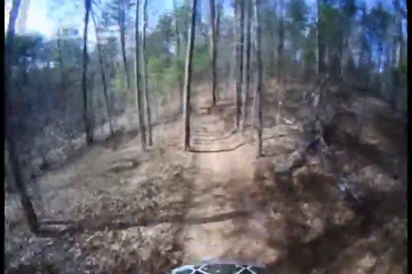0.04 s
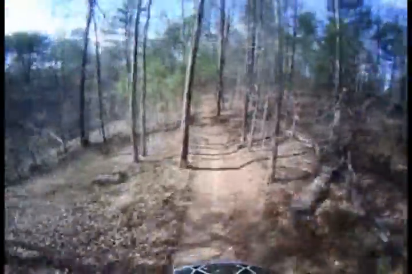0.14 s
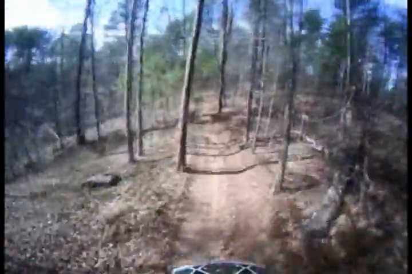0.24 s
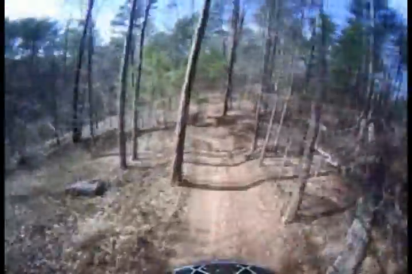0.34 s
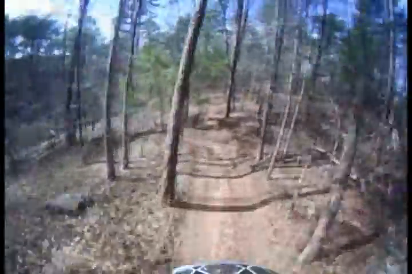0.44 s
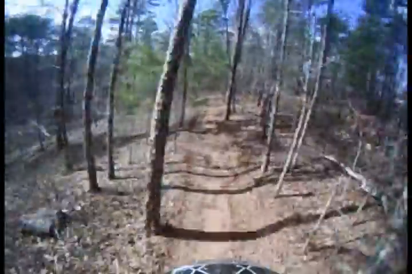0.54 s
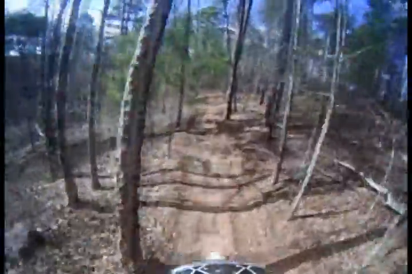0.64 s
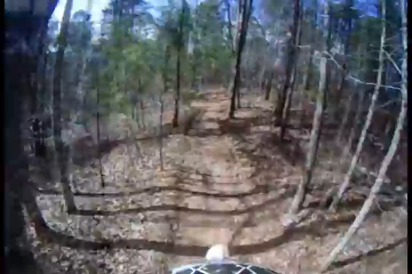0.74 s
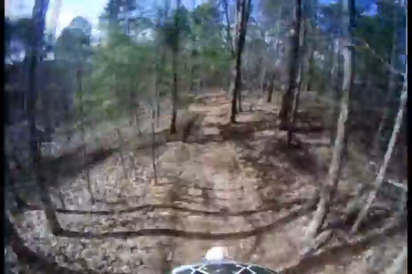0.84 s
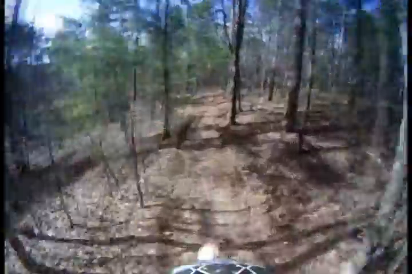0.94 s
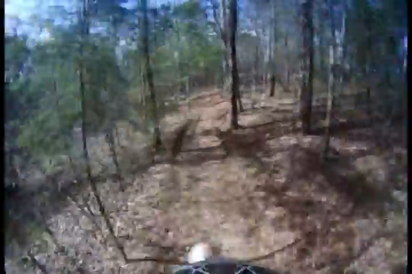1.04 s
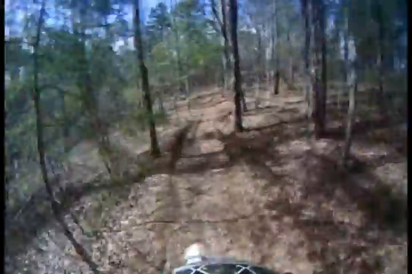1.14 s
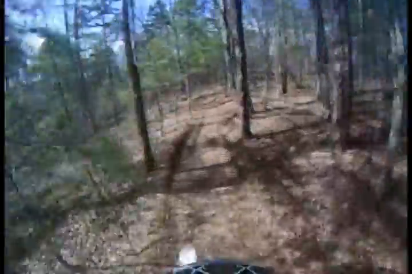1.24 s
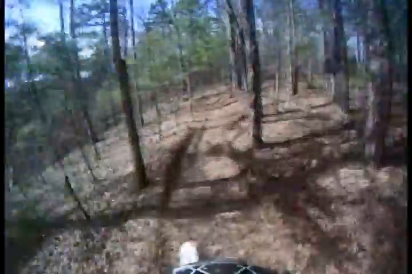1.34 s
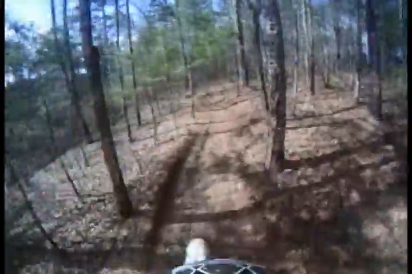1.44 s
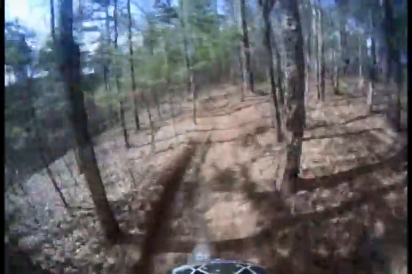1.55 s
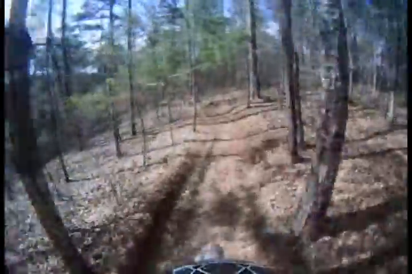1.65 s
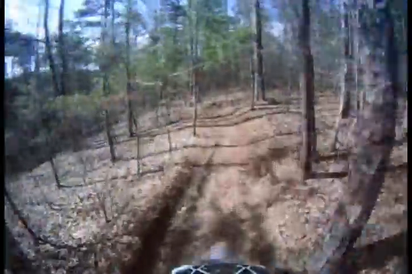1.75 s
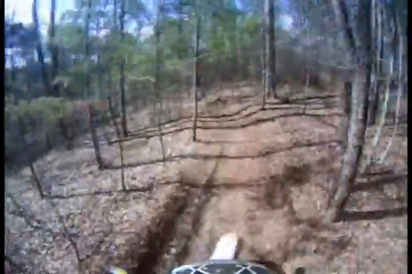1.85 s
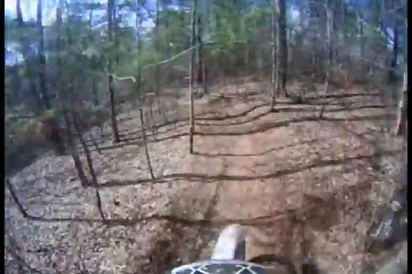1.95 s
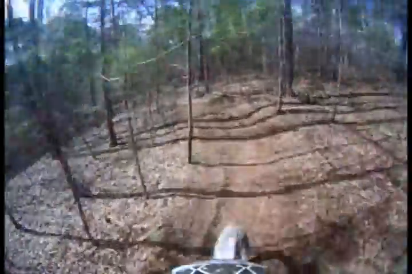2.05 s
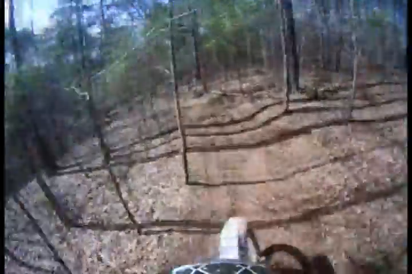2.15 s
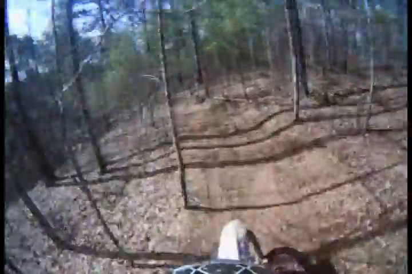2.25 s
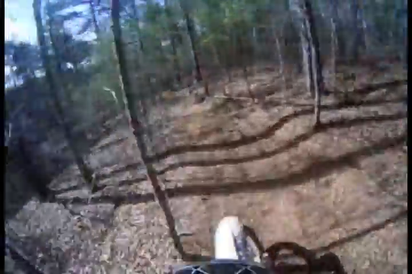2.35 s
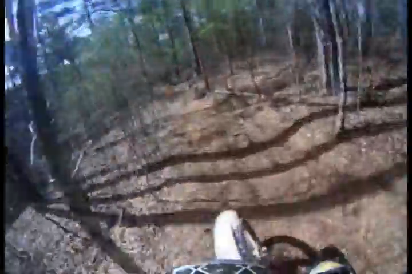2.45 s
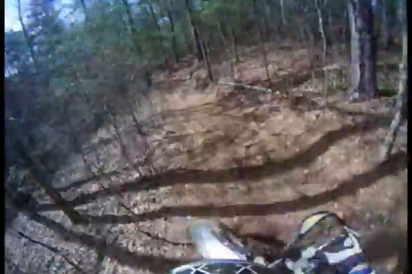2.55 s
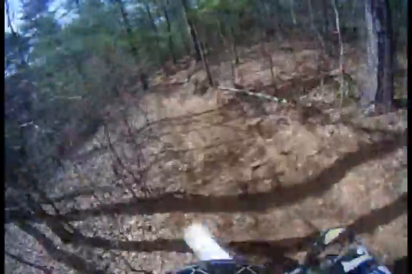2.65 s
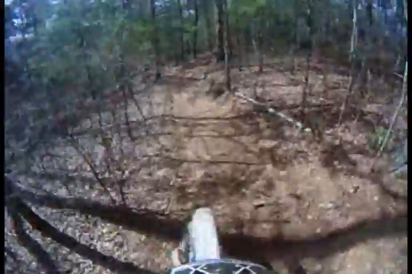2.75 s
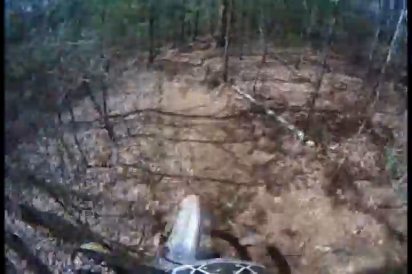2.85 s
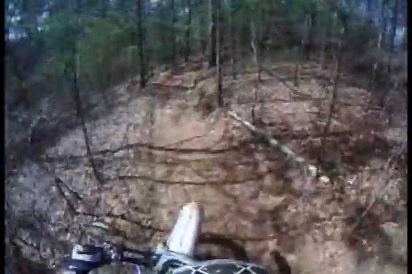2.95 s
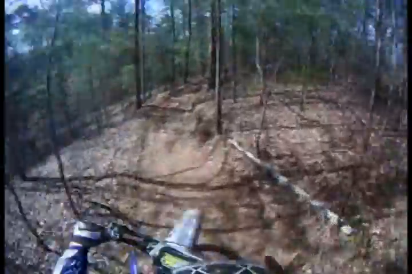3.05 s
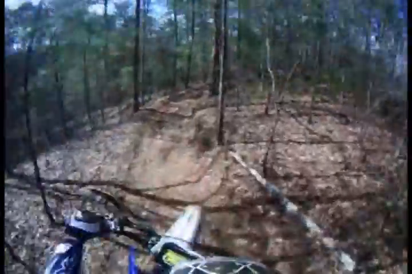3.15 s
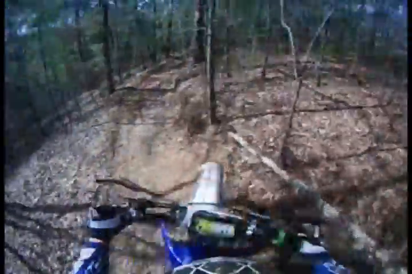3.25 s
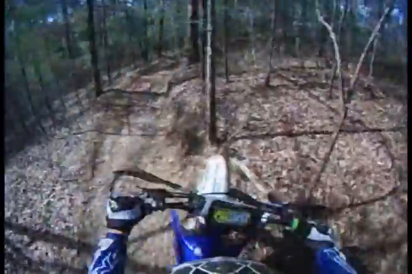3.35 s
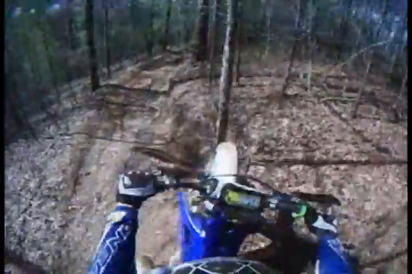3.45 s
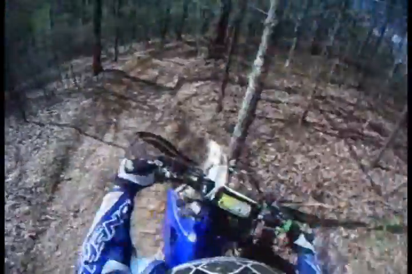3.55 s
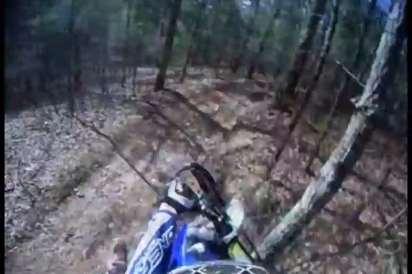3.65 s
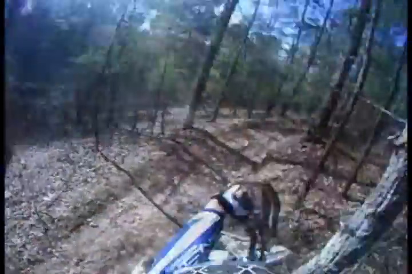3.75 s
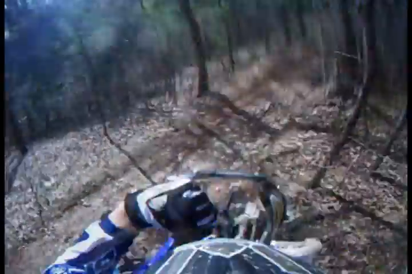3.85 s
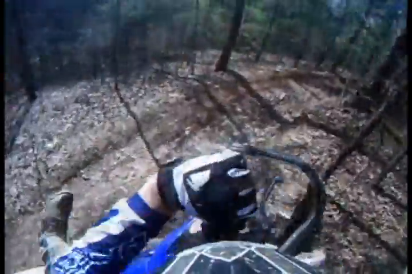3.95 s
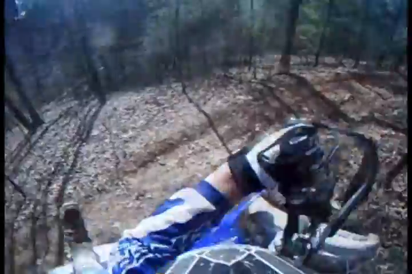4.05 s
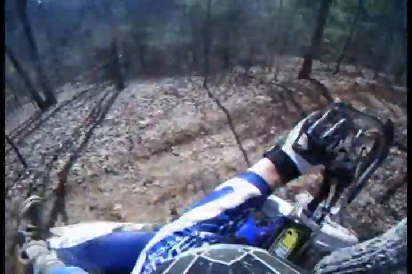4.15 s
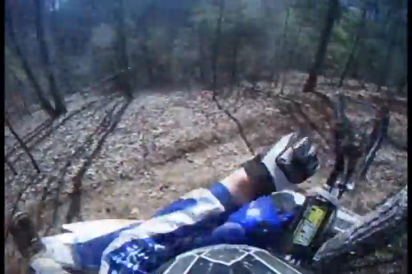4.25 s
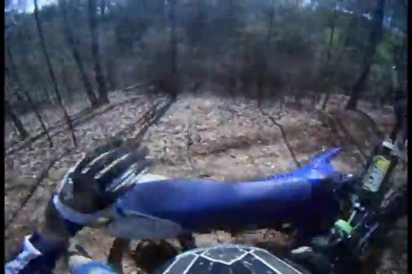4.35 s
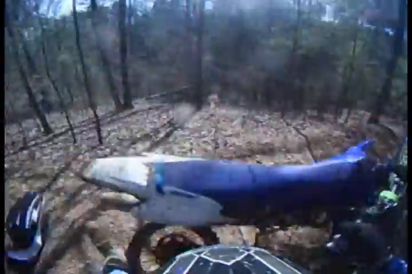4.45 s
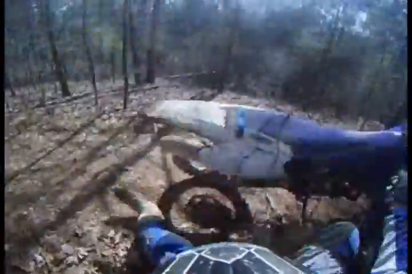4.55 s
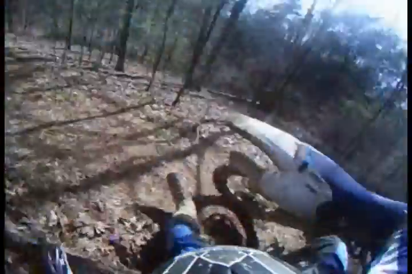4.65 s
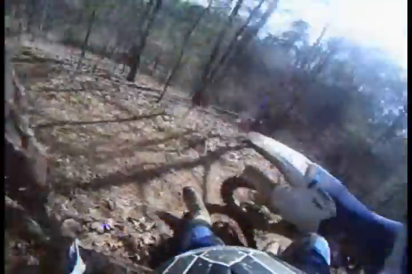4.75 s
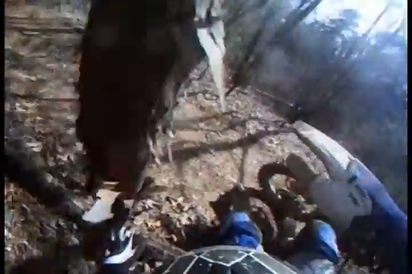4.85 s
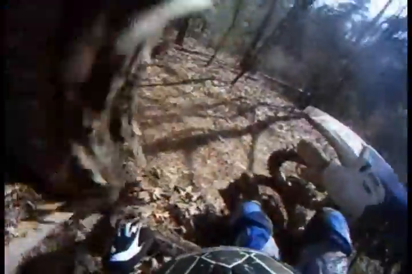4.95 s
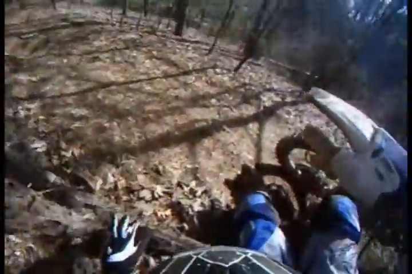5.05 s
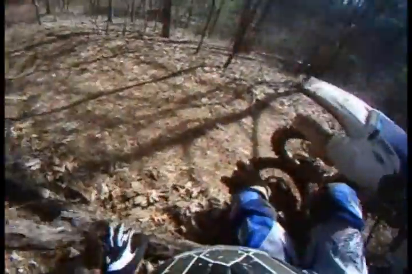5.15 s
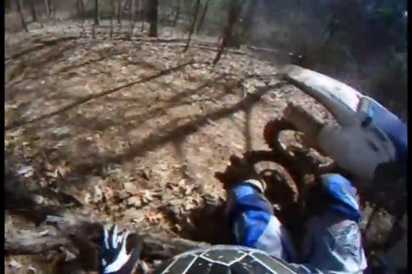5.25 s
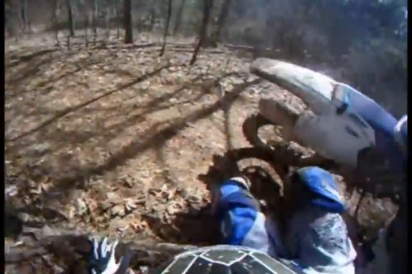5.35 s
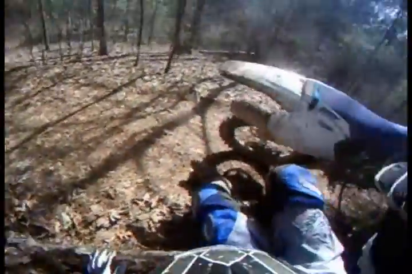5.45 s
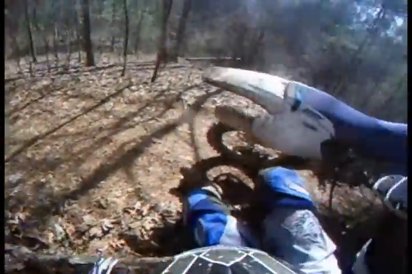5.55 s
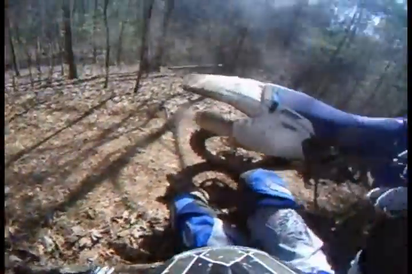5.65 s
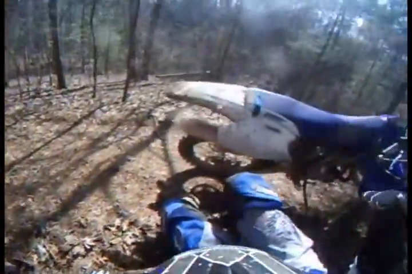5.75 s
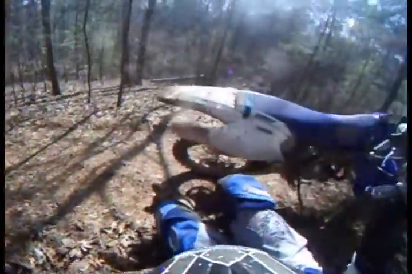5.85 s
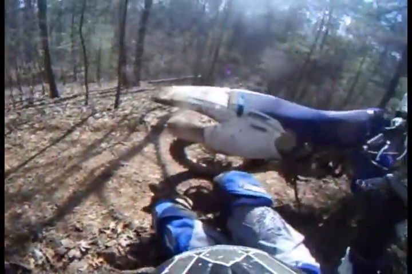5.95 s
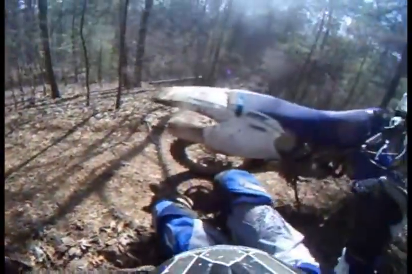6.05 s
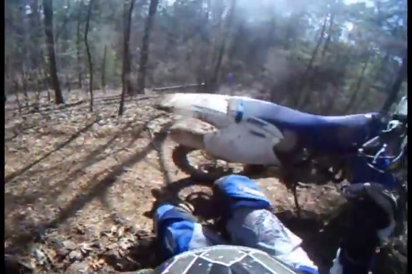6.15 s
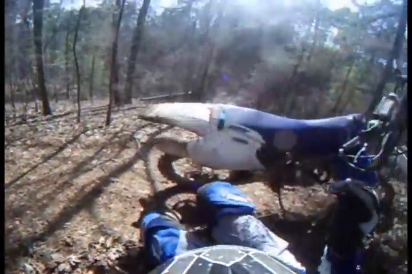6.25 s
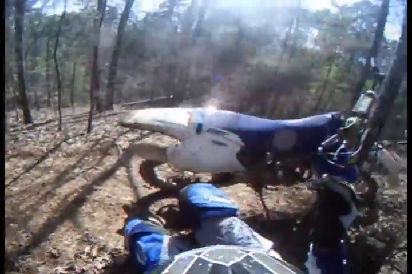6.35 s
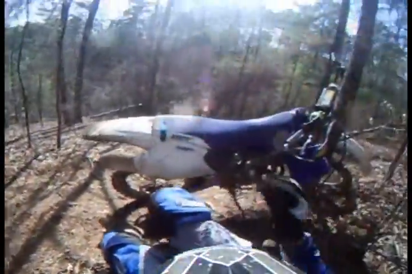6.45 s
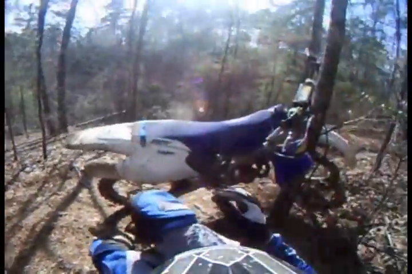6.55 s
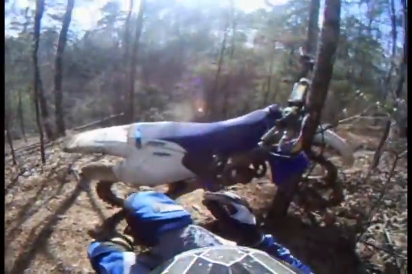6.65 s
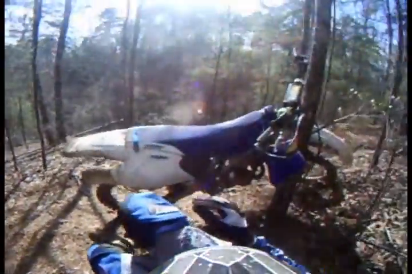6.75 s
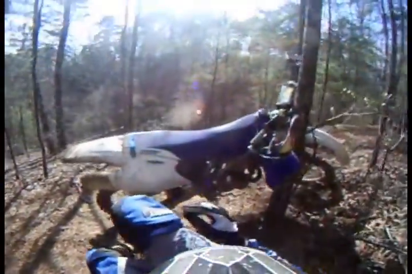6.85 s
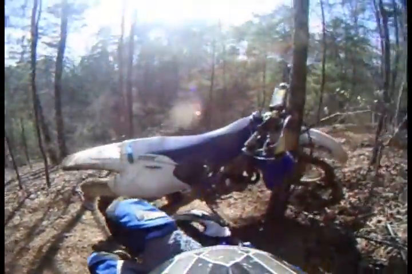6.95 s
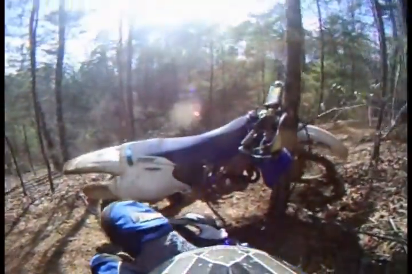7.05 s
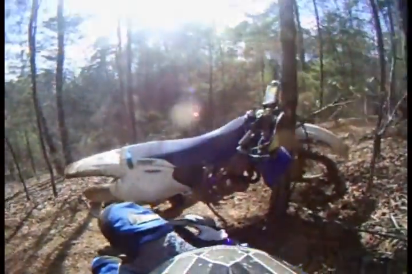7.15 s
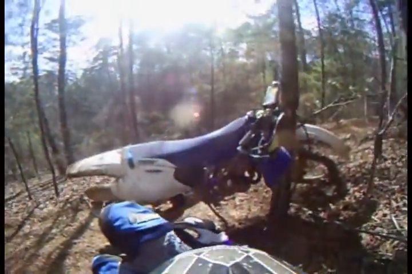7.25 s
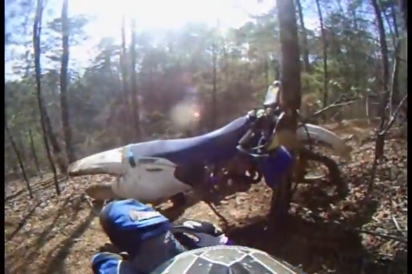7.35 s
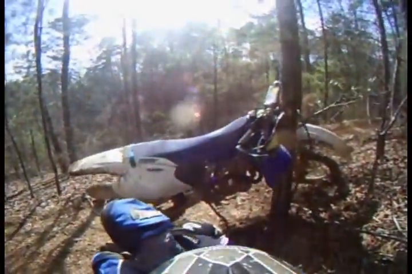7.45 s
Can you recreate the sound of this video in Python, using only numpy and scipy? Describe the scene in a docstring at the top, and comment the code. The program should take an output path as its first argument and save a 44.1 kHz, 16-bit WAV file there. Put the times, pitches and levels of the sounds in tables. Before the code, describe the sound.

Close, muffled sound from a rider's helmet: a single-cylinder dirt bike growls along a woodland trail in throttle bursts, with low wind buffeting. It bumps, revs once more, then hits a tree. Heavy thumps, cracking plastic and metal, and overloaded microphone crackles tumble over one another for two seconds. Afterwards the engine only puffs softly and unevenly, with a few small knocks.

```python
"""A forest trail, heard from a camera on the rider's helmet: a single-cylinder four-stroke dirt bike.
Firing pulses ring the airbox and exhaust pipe, noise whirs in the engine cases; six throttle twists shape the bark.
The bike hits a tree and falls: noise bursts ring the bodywork, sines thump and sway the helmet, and the camera
rattles in its mount, pinning the microphone from limit to limit so that it crackles.
Afterwards soft uneven puffs idle on the ground and dry leaves rustle as filtered noise."""
import sys
import numpy as np
from scipy import signal
from scipy.fft import rfft, irfft, next_fast_len
from scipy.io import wavfile
from scipy.ndimage import uniform_filter1d

SR = 44100
rng = np.random.default_rng(int(sys.argv[2]) if len(sys.argv) > 2 else 0)


def put_to_file(sound):
    """Save the sound as 16-bit audio at rate SR, in the file named by the first command-line argument."""
    columns = np.atleast_2d(sound).T  # one column per channel
    safe = np.clip(columns, -1, 1)
    whole_steps = np.round(safe * 32767)
    wavfile.write(sys.argv[1], SR, whole_steps.astype(np.int16))


N = 331178
TIME = np.arange(N) / SR
FALL_START_S, FALL_END_S = 4.6, 5.4      # the bike tips over
SLIDE_START_S, SLIDE_LENGTH_S, SLIDE_DECAY_DB_PER_S = 3.68, 1, 55.5
TUMBLE_ATTACK_S = 0.036


def from_db(db):
    """Decibels to gain."""
    return 10 ** (np.asarray(db) / 20)


def rms_one(x):
    """Scale to rms 1."""
    return x / np.sqrt(np.mean(x ** 2) + 1e-20)


def in_time(rows):
    """One curve over time for each column after the first."""
    s, *columns = np.transpose(rows)
    return [np.interp(TIME, s, column) for column in columns]


def cut(x, hz, kind, order=2):
    """Butterworth filter."""
    return signal.sosfilt(signal.butter(order, hz, kind, fs=SR, output="sos"), x)


def drift(hz):
    """Random wander slower than hz, with rms 1; a second of run-in is dropped."""
    return rms_one(cut(rng.standard_normal(N + SR), hz, "low")[SR:])


def coloured(x, spectrum):
    """Shape a sound with a smooth spectral curve; rms 1."""
    hz, db = np.transpose(spectrum)
    size = next_fast_len(N, True)
    bins = np.maximum(np.fft.rfftfreq(size, 1 / SR), 1)
    gain = from_db(np.interp(np.log(bins), np.log(hz), db))
    return rms_one(irfft(rfft(x, size) * gain, size)[:N])


def resonate(x, modes):
    """Parallel two-pole resonances, each given as centre Hz, width Hz and dB."""
    out = 0
    for hz, width, db in modes:
        r = np.exp(-np.pi * width / SR)
        zeros = np.array([1, 0, -1]) * (1 - r * r) / 2
        poles = [1, -2 * r * np.cos(2 * np.pi * hz / SR), r * r]
        out = out + from_db(db) * signal.lfilter(zeros, poles, x + 1e-18)
    return out


def envelope(start_s, hold_s, attack_s, decay_db_per_s):
    """Rise to 1 just before the start, hold, then die away."""
    rise = np.clip(1 + (TIME - start_s) / attack_s, 0, 1)
    return rise * from_db(-decay_db_per_s * np.maximum(TIME - start_s - hold_s, 0))


def fallen():
    """0 while the bike is upright, 1 once it lies on the ground."""
    return np.interp(TIME, [FALL_START_S, FALL_END_S], [0, 1])


def cycle_count(speed, firing_s):
    """Engine cycles gone by, counted from one firing."""
    cycles = np.cumsum(in_time(speed)[0]) / SR
    return cycles - np.interp(firing_s, TIME, cycles)


def firings(cycles, uneven_db, jitter_s):
    """One click per engine cycle, each with its own strength and slight timing error."""
    at = np.flatnonzero(np.diff(np.floor(cycles)) > 0)
    chance = rng.standard_normal((len(at), 2))
    places = np.clip(at + (chance[:, 0] * jitter_s * SR).astype(int), 0, N - 1)
    clicks = np.zeros(N)
    clicks[places] = from_db(uneven_db * chance[:, 1])
    return clicks


# engine speed while riding: [t/s, firing rate f/Hz]
RIDE_REVS = [(0, 46.2), (.23, 42.5), (.42, 52), (.55, 48.6), (.7, 49.4), (.89, 42.3), (1.05, 45.6),
             (1.23, 45.7), (1.6, 42.1), (1.89, 42.7), (2.17, 38.3), (2.48, 37.8), (2.66, 36.6), (2.8, 33.7),
             (2.85, 39), (2.99, 48), (3.12, 51.4), (3.25, 41.6)]


def engine():
    """One count of firings drives intake, exhaust and whirr; the idle has its own count."""
    revs = list(RIDE_REVS) + list(IDLE_REVS)
    speed, cycles = in_time(revs)[0], cycle_count(revs, firing_s=.531)
    load = throttle()
    return intake(cycles, load) + exhaust(cycles, speed, load) + whirr(cycles, speed, load) + idle()


# twists of the throttle: [t/s, held t/s, intake bark level/dB, swell in dB per s]
TWISTS = [(0, 0.095, -39, -42), (0.291, 0.416, -30, 3), (1.769, 0.19, -43, 17), (2.28, 0.46, -41.5, 28.5),
          (2.84, 0.3, -20.5, -9.5), (3.67, 0.07, -24, -22)]
THROTTLE_OPEN_S, THROTTLE_SHUT_DB_PER_S, THROTTLE_SHUT_DB = 0.02, 187, -55.5


def throttle():
    """Strength of the intake bark: each twist opens fast, swells or sags while held, and shuts."""
    load = from_db(THROTTLE_SHUT_DB) * envelope(0, FALL_START_S, THROTTLE_OPEN_S, SLIDE_DECAY_DB_PER_S)
    for s, held, db, swell in TWISTS:
        strength = from_db(db + swell * np.clip(TIME - s, 0, held))
        load = load + strength * envelope(s, held, THROTTLE_OPEN_S, THROTTLE_SHUT_DB_PER_S)
    return load


# airbox and frame resonances: [f/Hz, width f/Hz, level/dB]
AIRBOX = [(259.6, 55, 7), (300, 70, 5.5), (342, 60, -7), (545, 64, 4), (634, 29, -3.5), (786, 33, -9),
          (1000, 240, -7), (1340, 110, -10), (1404, 78, -3), (1840, 200, -23), (2520, 190, -33),
          (3050, 250, -32)]
FULL_BARK_DB, BARK_BODY_HZ = -17.5, 1070


def intake(cycles, load, duct_s=0.003485, echo=0.21, top_hz=2400):
    """Each gulp of air is a pulse with a faint puff; it echoes along the duct and rings in the airbox."""
    clicks = firings(cycles, uneven_db=1.2, jitter_s=.00003)
    puff_decay = np.exp(-1 / (.004 * SR))
    puff = .012 * signal.lfilter([1], [1, -puff_decay], clicks) * rng.standard_normal(N)
    trip = int(duct_s * SR)
    gulps = clicks + puff + echo * np.roll(clicks, trip) + echo ** 2 * np.roll(clicks, 2 * trip)
    bark = cut(scatter(resonate(gulps, AIRBOX)), top_hz, "low", order=3)
    body = cut(bark, BARK_BODY_HZ, "low", order=1)
    # a part-open throttle gives a rounder bark
    brightness = np.clip(load / from_db(FULL_BARK_DB), 1e-6, 1)
    return load * (body + brightness * (bark - body)) / np.std(bark)


# short sound paths between airbox and helmet: [delay t/s]
SCATTER_PATHS = [.0004, .0007, .0011, .0017]


def scatter(x):
    """Short reflections (allpasses) smear a click into a burst that is the same every time."""
    for delay_s in SCATTER_PATHS:
        taps = np.zeros(int(delay_s * SR) + 1)
        taps[0], taps[-1] = .55, 1
        x = signal.lfilter(taps, taps[::-1], x + 1e-18)
    return x


DRONE_DB, BOOM_DB = -29, -31.5
BOOM_CHOKE = 25      # the bark of an open throttle chokes the boom
OVERRUN_DB_PER_S = 15      # extra boom after the throttle shuts, per second it was held
OVERRUN_AFTER_S, OVERRUN_WIDTH_S = 0.11, 0.032
OVERTONE_DB, LUG_HZ, LUG_DB_PER_HZ = -35, 35.2, 1.33      # overtones weaken above this firing rate


def exhaust(cycles, speed, load):
    """A drone at twice the firing rate, and firings that boom when a harmonic meets a pipe resonance."""
    drone = from_db(DRONE_DB + 1.4 * drift(11)) * np.sin(4 * np.pi * cycles)
    clicks = firings(cycles, uneven_db=2.0, jitter_s=.00015)
    pipe = resonate(resonate(clicks, [(180.2, 8.3, 8.5), (131.0, 7.7, -4.5)]), [(178, 68, 0)])
    overrun_db = 0
    for s, held, _, _ in TWISTS:
        since_peak = TIME - s - held - OVERRUN_AFTER_S
        overrun_db = overrun_db + OVERRUN_DB_PER_S * held * np.exp(-(since_peak / OVERRUN_WIDTH_S) ** 2)
    boom = from_db(BOOM_DB + overrun_db) / (1 + BOOM_CHOKE * load) * rms_one(pipe)
    higher_modes = resonate(resonate(clicks, [(330.4, 18, 4.0), (582, 76, -4.5)]), [(399, 220, 0)])
    overtone_db = OVERTONE_DB - LUG_DB_PER_HZ * np.maximum(speed - LUG_HZ, 0)
    overtone = from_db(overtone_db) * rms_one(higher_modes)
    riding = np.interp(TIME, [3.3, 4.4, 5.4], [1, .4, 0])      # fades as the bike goes down
    return riding * (drone + boom + overtone)


# spectrum of the whirr: [f/Hz, level/dB]
WHIRR_COLOUR = [(300, 1), (450, -1), (580, -3), (800, -3.5), (1100, -8), (1430, -7), (1800, -9.5),
                (2440, -7.5), (3100, -15), (3650, -28), (4300, -30.5), (4950, -47), (5900, -30),
                (7500, -71.5)]
# ringing of the engine cases: [f/Hz, width f/Hz, level/dB]
CASES = [(1453, 34, 4.5), (2478, 98, -0.5), (3048, 220, -7), (5190, 2100, -14)]
WHIRR_DB, CRUISE_HZ, WHIRR_DB_PER_OCTAVE = -39.5, 43.9, 11      # gain at the cruising firing rate
WHIRR_LOAD = 0.098      # gain added per unit of intake bark
FALLEN_WHIRR_DB = -11.5      # the engine is screened once the bike lies down


def whirr(cycles, speed, load, throb=0.055):
    """Valve train and chain ring in the cases, throb with every cycle and grow with speed and load."""
    grains = rng.standard_normal(N) * (1 + throb * np.cos(2 * np.pi * cycles)) * from_db(2.1 * drift(170))
    noise = from_db(1.14) * coloured(grains, WHIRR_COLOUR) + from_db(-8) * rms_one(resonate(grains, CASES))
    speed_db = WHIRR_DB_PER_OCTAVE * np.log2(speed / CRUISE_HZ)
    level_db = WHIRR_DB + speed_db + FALLEN_WHIRR_DB * fallen()
    return (from_db(level_db) + WHIRR_LOAD * load) * noise


# the engine sinks unevenly to idle: [t/s, firing rate f/Hz]
IDLE_REVS = [(3.6, 36.4), (4.402, 24.2), (5.403, 27.7), (6.198, 24.3), (6.371, 26), (6.553, 35),
             (6.854, 25), (6.999, 25.2), (7.2, 26.4), (7.51, 22)]
# spectrum of the idle rumble: [f/Hz, level/dB]
IDLE_COLOUR = [(15, -19), (25, 9), (44, -1), (59, 4.5), (183, -9), (249, -37.5), (374, -16.5), (957, -33),
               (1200, -32), (1560, -88), (2640, -120)]


def idle():
    """Soft, uneven puffs from the silencer of the fallen bike, over a low rumble."""
    clicks = firings(cycle_count(IDLE_REVS, firing_s=5.4605), uneven_db=4.2, jitter_s=.0016)
    silencer = resonate(clicks, [(56.7, 112, 33), (123.4, 23, 6.5), (185, 69, -8.0)])
    puffs = -rms_one(cut(silencer, 234, "low", order=3))
    rumble = coloured(rng.standard_normal(N), IDLE_COLOUR)
    low = rms_one(cut(rng.standard_normal(N), [24, 50], "band"))
    fade_in = np.interp(TIME, [4.3, 5.3], [0, 1])
    return fade_in * (from_db(-38.0) * puffs + from_db(-40.5) * rumble + from_db(-37.5) * low)


# blows on plastic, metal and dry brush: [t/s, level/dB, length t/s, own ring f/Hz]
BLOWS = [(2.673, -22, 0.018, 2500), (3.171, -23, 0.0098, 3300), (3.429, -7, 0.015, 2310),
         (3.694, -24, 0.076, 2010), (3.821, -8, 0.036, 2290), (3.869, -4.5, 0.0064, 1990),
         (3.987, -19, 0.0063, 2280), (3.992, 0, 0.018, 1970), (4.294, -24.5, 0.0064, 2900),
         (4.4, -12, 0.0015, 2510), (4.427, -25, 0.0081, 3180), (4.471, -25, .008, 1810),
         (4.49, -22, 0.0073, 3120), (4.681, -13, 0.016, 2350), (4.774, -30, 0.09, 2980),
         (4.794, 3.5, .004, 2900), (5.094, -22.5, 0.031, 2780), (5.168, -1.5, 0.014, 3150),
         (5.207, -5, 0.0077, 3150), (5.237, -8.5, .015, 2640), (5.268, -7.5, 0.018, 2450),
         (5.284, -3, 0.019, 2700), (5.307, -18.5, 0.023, 2600), (5.973, -20.5, 0.0058, 2780),
         (6.566, -29, 0.017, 2370), (7.35, -39.5, 0.0058, 2240), (7.436, -44, 0.0069, 2320),
         (7.476, -36.5, 0.024, 2290)]
# what the blows ring with: [f/Hz, width f/Hz, level/dB]
BODYWORK = [(580, 340, 7.5), (1130, 390, 10), (1472, 166, 13.5), (1940, 280, 11), (2357, 160, 15),
            (2900, 120, -2), (3350, 300, -30.5), (4070, 500, -22.5), (4900, 740, -57.5), (5340, 280, 2)]


def blows(grain_db=3.0, tail_s=0.0053, ring_db=-3):
    """Each blow is a short crush of tiny cracks into the bodywork, with one ring of its own."""
    crush, rings = np.zeros(N), np.zeros(N)
    for s, db, length, hz in BLOWS:
        start = int(s * SR)
        age = TIME[:min(SR // 8, N - start)]
        crack_db = grain_db * (np.minimum(rng.exponential(1, len(age)), 4) - 4.5)
        cracks = rng.standard_normal(len(age)) * from_db(crack_db)
        # a sharp attack, a slow sag over the length, then a fast tail
        decay = np.exp(-.5 * age / length - np.maximum(age - length, 0) / tail_s)
        burst = from_db(db) * cracks * np.minimum(age / 0.00013, 1) * decay
        span = slice(start, start + len(age))
        crush[span] += burst
        rings[span] += resonate(burst, [(hz, 260, ring_db)])
    return resonate(crush, BODYWORK) + from_db(18) * cut(rings, 5000, "low", order=4)


# the camera rattles in its mount: [t/s, length t/s, number of knocks, last one stays pressed t/ms]
RATTLES = [(3.29, .0286, 4, 12), (3.3428, .0188, 2, 23), (3.3847, .0197, 2, 14), (3.4389, .0165, 2, 6),
           (3.7906, .016, 2, 8), (3.8719, .0141, 2, 55), (3.9339, .033, 2, 8), (3.9763, .0045, 2, 3),
           (4.007, .029, 6, 28), (4.0586, .0244, 2, 18), (4.1016, .0184, 2, 4), (4.1241, .0154, 3, 35),
           (4.169, .0206, 2, 6), (4.195, .0246, 2, 10), (4.2287, .0431, 4, 9), (4.656, .028, 4, 8),
           (4.7133, .0132, 2, 9), (4.824, 0, 1, 3), (5.1155, .0035, 2, 17), (5.136, .024, 2, 8),
           (5.1991, .0325, 3, 6)]
RATTLE_SLOWING = 1.15      # over 1: the gaps between knocks lengthen


def knocks():
    """The knocks of all rattles as (s, hold s): each presses the camera until the next one."""
    rows = []
    for s, length, count, last_ms in RATTLES:
        times = s + length * np.linspace(0, 1, int(round(count))) ** RATTLE_SLOWING
        rows += zip(times, np.append(np.diff(times), last_ms / 1000))
    return rows


def jolts(force=0.73, bounce_s=0.00031, seat_s=0.001364, windup_s=0.0031, snap_hz=2600):
    """Camera pressure and hold (0-1): drawn one way, it snaps back, bounces, stays pressed and relaxes."""
    push, age, side = np.zeros(N), TIME[:SR // 8], -1
    lead = int(windup_s * SR)
    draw = np.linspace(0, 1, lead) ** 3
    hits = knocks()
    for (s, hold_s), (early, late, size) in zip(hits, rng.random((len(hits), 3))):
        at, side = int(s * SR), -side      # knocks alternate in direction
        bounce = int(bounce_s * SR * (.5 + early))
        seat = int(seat_s * SR * (0.907 + .5 * late))
        push[at - lead:at] += draw * (-side - push[at - lead:at])
        push[at:at + len(age)] = side * np.exp(-np.maximum(age - hold_s, 0) / .002)
        push[at:at + bounce] = side * (size - .15)      # the first touch is lighter than the seating
        push[at + bounce:at + seat] = -side
    held = np.clip(uniform_filter1d(np.abs(push), size=130), 0, 1)
    return force * cut(push, snap_hz, "low"), held


# strikes on tree and ground: [t/s, length t/s, sway level/dB, sway decay in dB per s, thud level/dB]
TUMBLES = [(3.291, .19, -4, 150, -25), (3.739, 0.24, 0.5, 196, -14), (4.041, 0.23, 3.5, 135.5, -12),
           (4.411, 0.098, -4, 113, -31), (4.669, 0.023, 2, 219, -13.5), (4.825, 0.026, -1.5, 187, -16.5),
           (5.142, .15, -1.5, 124, -18.5)]
THUD_DECAY_DB_PER_S = 398.5
# rough ground before the tree
ROUGH_START_S, ROUGH_LENGTH_S, ROUGH_SWAY_DB, ROUGH_DECAY_DB_PER_S = 2.72, 1, -20.5, 94


def shake(sway_hz=35, wander=0.1736):
    """Each tumble sways the helmet at a low, wandering resonance, with a dull thud that dies sooner."""
    rough = envelope(ROUGH_START_S, ROUGH_LENGTH_S, TUMBLE_ATTACK_S, ROUGH_DECAY_DB_PER_S)
    sway, thud = from_db(ROUGH_SWAY_DB) * rough, 0
    for s, length, sway_db, decay, thud_db in TUMBLES:
        sway = np.maximum(sway, from_db(sway_db) * envelope(s, length, TUMBLE_ATTACK_S, decay))
        thud = thud + from_db(thud_db) * envelope(s, length, TUMBLE_ATTACK_S, THUD_DECAY_DB_PER_S)
    turns = np.cumsum(sway_hz * (1 + wander * drift(12.18))) / SR
    rumble = rms_one(cut(cut(rng.standard_normal(N), [70, 260], "band"), 830, "low"))
    return sway * np.sin(2 * np.pi * turns) + thud * rumble


# dull bumps of suspension, body and limbs: [t/s, level/dB, f/Hz]
BUMPS = [(2.705, -15, 289), (2.735, -24, 280), (2.762, -18, 295), (3.664, -4, 143), (3.979, -1, 210),
         (4.421, -10.5, 160), (4.478, -2.5, 194), (4.805, -3.5, 176), (4.836, 2.5, 165),
         (6.249, -31.5, 278), (6.566, -28.5, 197), (7.137, -29.5, 213), (7.479, -31, 387)]


def bumps(decay_s=0.01):
    """Suspension, body and padded limbs knock dully: low sines that die within hundredths of a second."""
    out = np.zeros(N)
    for s, db, hz in BUMPS:
        age = np.maximum(TIME - s, 0)
        out += from_db(db) * np.sin(2 * np.pi * hz * age) * np.exp(-np.minimum(age / decay_s, 20))
    return out


# ring of twigs and loose parts: [f/Hz, width f/Hz, level/dB]
DEBRIS = [(2500, 200, -6.5), (3050, 130, 1.5), (4780, 250, -7)]
DEBRIS_PER_S, DEBRIS_DB = 24, -41


def debris(sliding, uneven_db=4, tick_s=.004):
    """Twigs and loose parts tick at random under the sliding bike: short noise bursts that ring."""
    sizes = from_db(uneven_db * np.clip(rng.standard_normal(N), -2, 2))
    ticks = (rng.random(N) < DEBRIS_PER_S / SR) * sizes
    decays = signal.lfilter([1], [1, -np.exp(-1 / (tick_s * SR))], ticks + 1e-18)
    bursts = decays * rng.standard_normal(N)
    return from_db(DEBRIS_DB) * sliding * rms_one(resonate(bursts, DEBRIS))


LEAVES_SLIDE_DB, LEAVES_REST_DB = -44, -68.5


def leaves(sliding, patchy_db=3.5):
    """Leaf litter rustles under the sliding bike, then softly as the rider shifts on the ground."""
    litter = [(630, 810, -6.5), (1090, 260, 6.5), (1460, 420, -10.5), (2625, 760, 2)]
    rustle = rms_one(resonate(rng.standard_normal(N), litter))
    level = from_db(LEAVES_SLIDE_DB) * sliding + from_db(LEAVES_REST_DB) * fallen()
    return level * from_db(patchy_db * drift(11)) * cut(rustle, 4000, "low", order=4)


# wind on the helmet, dying away in the crash: [t/s, level/dB]
WIND = [(0, -26), (.9, -27.5), (2.0, -30.5), (2.5, -27.5), (3.3, -25), (3.8, -69)]


def wind(lumpy_db=2.5):
    """Lumpy low buffeting on the helmet: noise weighted to the bass, with a drifting level."""
    colour = [(12, -9.5), (25, 5.5), (45, -8), (70, -11), (140, -12.5), (300, -16), (900, -58.5)]
    noise = coloured(rng.standard_normal(N), colour)
    return from_db(in_time(WIND)[0] + lumpy_db * drift(14)) * noise


def scene():
    """Engine, wind, crash and camera motion all meet at one microphone."""
    push, held = jolts()
    sliding = envelope(SLIDE_START_S, SLIDE_LENGTH_S, TUMBLE_ATTACK_S, SLIDE_DECAY_DB_PER_S)
    # a firmly pressed camera does not sway
    crash = shake() * (1 - held) + blows() + bumps() + debris(sliding) + leaves(sliding)
    return (engine() + wind() + crash + push)[None]


MIC_LIMIT, BASS_CUT_HZ, MIC_DIP_HZ = 0.53, 54.5, 4210
TREBLE_CUT_HZ, CUTOFF_HZ = 4740, 13000


def record(dry):
    """The input saturates; behind the bass cut a pinned signal sinks to silence, so each flip is a spike."""
    pinned = dry / (1 + (dry / MIC_LIMIT) ** 6) ** (1 / 6)
    dull = pinned - 0.58 * resonate(pinned, [(MIC_DIP_HZ, 1500, 0)])      # the closed housing swallows treble
    voiced = cut(cut(dull, BASS_CUT_HZ, "high", order=1), TREBLE_CUT_HZ, "low", order=10)
    hiss = from_db(-97) * rng.standard_normal(N)
    top_cut = signal.ellip(10, .1, 80, CUTOFF_HZ, fs=SR, output="sos")
    return signal.sosfilt(top_cut, np.clip(voiced + hiss, -1, 1))


dry = scene()
out = record(dry)
put_to_file(out)
```